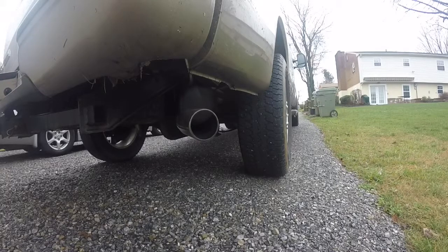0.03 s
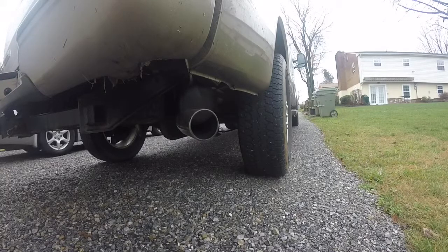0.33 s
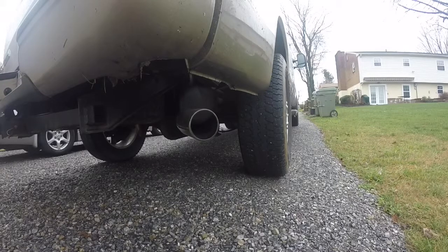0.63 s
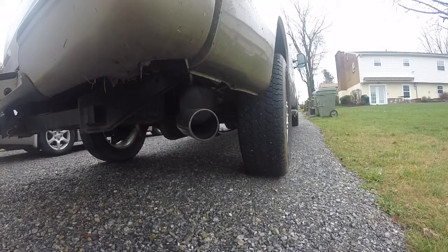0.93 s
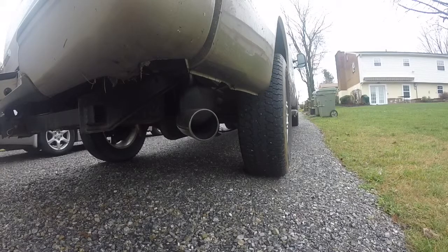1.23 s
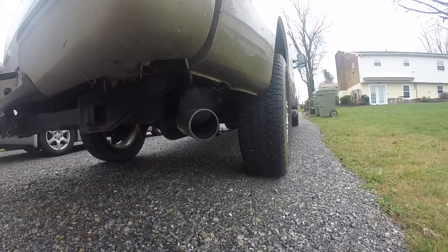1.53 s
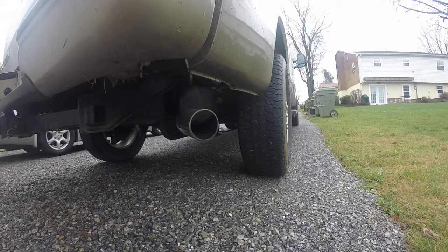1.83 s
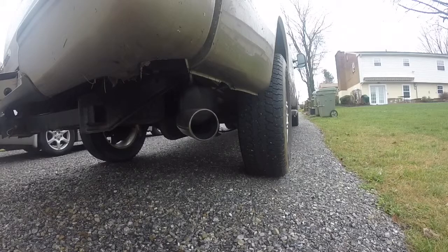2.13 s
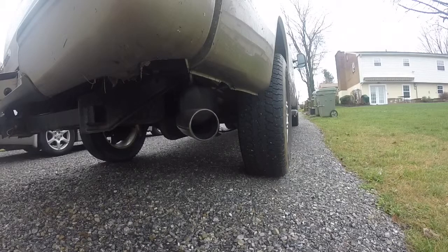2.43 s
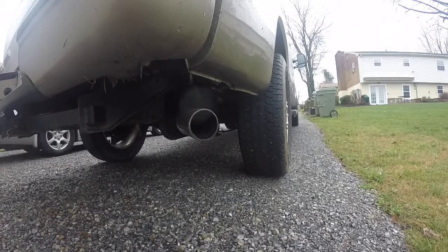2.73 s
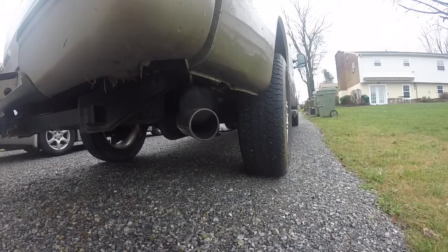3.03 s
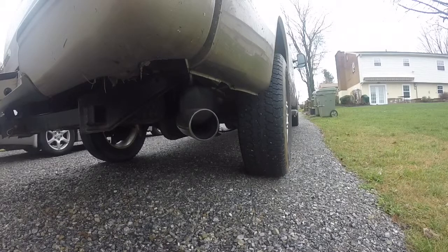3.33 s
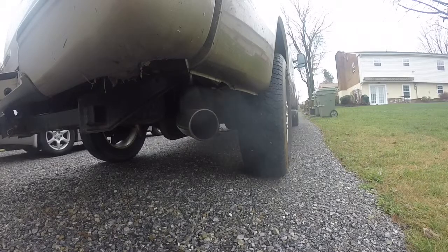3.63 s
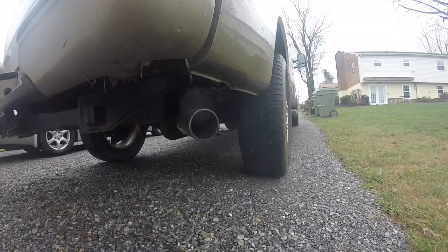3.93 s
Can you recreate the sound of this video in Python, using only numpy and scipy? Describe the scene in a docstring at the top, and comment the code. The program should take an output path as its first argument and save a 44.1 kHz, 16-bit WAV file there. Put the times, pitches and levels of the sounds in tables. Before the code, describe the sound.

A diesel truck engine starts outdoors, with the microphone near the exhaust pipe. After a quiet pump hum, the starter grinds rhythmically until the engine fires, booms and squeals briefly, then idles with a clattering rumble and slight hiss.

```python
"""A diesel pickup starts from cold on a driveway, heard from just behind the tailpipe.
First a fuel pump hums over the outdoor air. The pinion clacks in and the starter gears whine, their
pitch sagging under the load of each compression. Lone ignitions follow; then the engine catches and
runs up with hard knocks that ring the block, a squeal, and pressure pulses that boom in the pipe.
Last it settles, chattering, into a lumpy eight-cylinder idle with a little exhaust hiss."""
import sys
import numpy as np
from scipy import signal
from scipy.fft import rfft, irfft
from scipy.io import wavfile

SR = 44100
rng = np.random.default_rng(int(sys.argv[2]) if len(sys.argv) > 2 else 0)


def store_wav(level_fs):
    """Save 16-bit WAV to argv[1]."""
    pcm = np.round(np.clip(np.atleast_2d(level_fs), -1, 1) * 32767)
    wavfile.write(sys.argv[1], SR, pcm.T.astype(np.int16))


N = 176400
T = np.arange(N) / SR
BURST_RISE_S = 0.0045


def from_db(db):
    """Amplitude ratio: tenfold for every 20 dB."""
    return 10 ** (np.asarray(db) / 20)


def rms_one(x):
    """Normalisation to unit rms."""
    return x / np.sqrt(np.mean(x ** 2) + 1e-20)


def curve(rows, t=T):
    """Linear interpolation of (time_s, value) rows at times t."""
    return np.interp(t, *np.transpose(rows))


def drift(hz):
    """Random fluctuation: low-passed noise of unit rms."""
    r = np.exp(-2 * np.pi * hz / SR)
    return rms_one(signal.lfilter([1], [1, -2 * r, r * r], rng.standard_normal(N + SR))[SR:])


def colour(x, spectrum):
    """Minimum-phase filtering by (frequency_hz, level_db) rows, falling 18 dB an octave beyond them."""
    size = 2 * N
    hz, db = np.transpose(spectrum)
    octave = np.log2(np.maximum(np.arange(N + 1) * SR / size, 1))
    outside = np.abs(octave - np.clip(octave, np.log2(hz[0]), np.log2(hz[-1])))
    shape_db = np.interp(octave, np.log2(hz), db) - 18 * outside
    cepstrum = irfft(np.log(from_db(shape_db)))
    cepstrum[1:N] *= 2  # folding the cepstrum makes the filter causal
    cepstrum[N + 1:] = 0
    return irfft(rfft(x, size) * np.exp(rfft(cepstrum)))[:N]


def noise(spectrum):
    """Spectral shaping of white noise, at unit rms."""
    return rms_one(colour(rng.standard_normal(N), spectrum))


def clicks(times, gains):
    """Impulse excitation at the given times."""
    out, at = np.zeros(N), (times * SR).astype(int)
    np.add.at(out, at[at < N], gains[at < N])
    return out


def burst(start_s, decay_s, hold_s):
    """Transient envelope: linear rise, hold, exponential decay."""
    rise = np.clip((T - start_s) / BURST_RISE_S, 0, 1)
    return rise * np.exp(-np.maximum(T - start_s - hold_s, 0) / decay_s)


def casing(x, modes, share):
    """Resonance: each mode of a metal casing lifts a narrow band."""
    out = x
    for hz, width_hz, lift_db in modes:
        r = np.exp(-np.pi * width_hz / SR)
        feedback = [1, -2 * r * np.cos(2 * np.pi * hz / SR), r * r]
        band = signal.lfilter(np.array([1, 0, -1]) * (1 - r * r) / 2, feedback, x)
        out = out + share * (from_db(lift_db) - 1) * band
    return out


def rattle(envelope, spectrum, modes, grain_db):
    """Random excitation: dense metal contacts of uneven size ring a casing."""
    contacts = rng.standard_normal(N) * from_db(grain_db * drift(350))
    steady_rms = np.std(casing(colour(contacts, spectrum), modes, share=0.57))
    return casing(colour(contacts * envelope, spectrum), modes, share=.5) / steady_rms


# outdoor noise spectrum: frequency_hz, density_db
AIR_SPECTRUM = [(15, -31), (25, -7), (85, -1), (142, -7), (284, -11), (413, -23.5), (512, -17.5),
                (634, -20), (806, -18), (1270, -30), (14800, -55)]

def outdoor_air():
    """Ambient noise: steady, with most of its power at low frequencies."""
    return from_db(-44) * noise(AIR_SPECTRUM)


# pump harmonics: pitch_hz, level_db
PUMP_HARMONICS = [(285.3, -60.5), (570.6, -59.5), (855.9, -63), (1141, -59.5)]
# spectrum of flowing fuel: frequency_hz, density_db
FUEL_SPECTRUM = [(200, 0), (600, 3.5), (1150, -4.5), (1350, -22)]

def fuel_pump():
    """Periodic pumping gives a harmonic hum over flow noise, until just before cranking."""
    clock = np.cumsum(1 + 0.0016 * drift(10.5)) / SR
    hum = sum(from_db(db) * np.sqrt(2) * (1 + 0.45 * drift(23)) * np.sin(2 * np.pi * hz * clock)
              for hz, db in PUMP_HARMONICS)
    flow = from_db(-61) * noise(FUEL_SPECTRUM)
    stop_s, fade_s = 1.174, .06
    return (hum + flow) * np.clip((stop_s - T) / fade_s, 0, 1)


def moan():
    """A glide: one low tone sinks as the engine first turns over."""
    start_s, length_s = 1.5, 0.16
    progress = np.clip((T - start_s) / length_s, 0, 1)
    hz = 166 + 56 * (1 - progress) ** 2
    return from_db(-32) * np.sin(np.pi * progress) * np.sin(2 * np.pi * np.cumsum(hz) / SR)


STARTER_ON_S, STARTER_OFF_S = 1.324, 2.52
# spectrum of the pinion engaging: frequency_hz, density_db
CLACK_SPECTRUM = [(130, 1), (542, -22.5), (838, 2), (1430, -22), (3040, -16.5), (4610, -17.5),
                  (14800, -45.5)]
# blows between gear teeth: start_s, level_db
CLUNKS = [(1.353, -23.5), (2.078, -27.5), (2.427, -22)]
# spectrum of those blows: frequency_hz, density_db
CLUNK_SPECTRUM = [(700, -15.5), (870, 0.5), (1150, -18), (2300, -48)]

def pinion():
    """Impact and backlash: the pinion strikes the ring gear, then clunks as teeth take up slack."""
    strike = burst(STARTER_ON_S, decay_s=0.0054, hold_s=0.036)
    clack = from_db(-31.5) * rattle(strike, CLACK_SPECTRUM, [], grain_db=-2)
    blows = sum(from_db(db) * burst(s, decay_s=0.01, hold_s=BURST_RISE_S) for s, db in CLUNKS)
    return clack + blows * noise(CLUNK_SPECTRUM)


def underbody(x):
    """Interference: reflections between road and chassis make a gliding tone flutter."""
    t, decay_s = T[T < .05], 0.013
    echoes = rng.standard_normal(len(t)) * np.exp(-t / decay_s)
    return x + 0.54 * signal.fftconvolve(x, echoes / np.linalg.norm(echoes))[:N]


SPIN_UP_S, FIRST_PEAK_S, RECOVERY_SHARE = 1.365, 1.487, .48
GROAN_HZ, GROAN_WIDTH_HZ = 851, 53  # near the housing's lowest mode
# compressions while cranking: slowest_s, preceding_peak_hz, slowest_pitch_hz, groan_db
COMPRESSIONS = [(1.578, 989, 745, 5), (1.743, 1171, 777, 5.5), (1.86, 1240, 845.5, 4.5),
                (1.977, 1271, 920.5, -8), (2.09, 1286, 922, -4), (2.205, 1254, 921, -9),
                (2.315, 1270, 916.5, 1), (2.43, 1264, 903, -5)]
# gear mesh partials: pitch_ratio, level_db
MESH_PARTIALS = [(.5, -5), (1, -5), (2, -6), (2.5, -12), (3, -9.5)]
# spectrum of grinding gears: frequency_hz, density_db
GRIND_SPECTRUM = [(130, -14), (324, -1.5), (379, -16), (445, -2.5), (586, -5.5), (855, 0.5), (1460, -23),
                  (1820, -22.5), (3160, -17), (4200, -31.5), (6800, -33.5), (9500, -54.5)]
# bell housing modes: frequency_hz, bandwidth_hz, lift_db
HOUSING_MODES = [(870, 63, 2), (1842, 34, 10), (2454, 76, 10), (3110, 73, 3)]

def starter():
    """Frequency modulation by load: meshing gears slow into each compression and race out of it."""
    slow_s, fast_hz, slow_hz, groan_db = np.transpose(COMPRESSIONS)
    fast_s = np.r_[FIRST_PEAK_S, slow_s[:-1] + RECOVERY_SHARE * np.diff(slow_s)]
    turns_s = np.r_[SPIN_UP_S, np.c_[fast_s, slow_s].ravel(), STARTER_OFF_S]
    turns_hz = np.r_[slow_hz[0], np.c_[fast_hz, slow_hz].ravel(), fast_hz[-1]]
    steps = np.arange(len(turns_s))
    stroke = np.interp(T, turns_s, steps)  # even when slowest, odd when fastest
    eased_stroke = np.floor(stroke) + (1 - np.cos(np.pi * (stroke % 1))) / 2
    hz = np.interp(eased_stroke, steps, turns_hz)
    phase = 2 * np.pi * np.cumsum(hz * (1 + 0.009 * drift(80))) / SR

    running = np.clip((T - STARTER_ON_S) / 0.035, 0, 1) * np.clip((STARTER_OFF_S - T) / 0.047, 0, 1)
    stroke_ahead = np.interp(T + .03, T, stroke)  # load peaks just before the pitch is lowest
    load = running * from_db(3 * np.cos(np.pi * stroke_ahead))
    # the gears quieten while the engine runs ahead of them
    overrun = np.clip(-2 * np.sin(np.pi * (stroke - 1)), 0, 1) * (T > FIRST_PEAK_S)
    coasting = from_db(-6.5 * overrun)

    resonance = np.exp(-.5 * ((hz - GROAN_HZ) / GROAN_WIDTH_HZ) ** 2)
    groan_gain = from_db(np.interp(T, slow_s, groan_db) - 26.5) * resonance
    groan = groan_gain * running * (1 + 0.22 * drift(90)) * np.sin(phase)
    partials = sum(from_db(db) * (1 + 0.45 * drift(70)) * np.sin(k * phase) for k, db in MESH_PARTIALS)
    whine = from_db(-40) * running * partials
    # uneven teeth crowd rough sidebands around the upper partials
    sidebands = sum(drift(22) * np.sin(k * phase) for k in np.arange(9, 30) / 4)
    rasp = from_db(-45.5) * load * hz / GROAN_HZ * rms_one(colour(sidebands, GRIND_SPECTRUM))
    gears = underbody(casing(whine + rasp, HOUSING_MODES, share=1.6))
    grind = from_db(-31.5) * rattle(load, GRIND_SPECTRUM, HOUSING_MODES, grain_db=1.5)
    return coasting * (gears + groan) + grind


# spectrum of gas leaving the pipe: frequency_hz, density_db
HISS_SPECTRUM = [(3000, -33.5), (4050, -3), (4300, -7.5), (4620, -0.5), (5300, -14.5), (8000, -25),
                 (14000, -49)]
# hiss envelope: time_s, level_db
HISS_LEVELS = [(2.95, -82), (3.1, -55.5), (3.42, -64.5), (3.56, -52.5), (3.85, -47.5), (4.0, -50.5)]

def tailpipe_hiss():
    """Flow noise: gas rushes from the tailpipe with a thin whistle once the engine runs."""
    whistle = from_db(-60.5) * drift(40) * np.sin(2 * np.pi * 4600 * T)
    rush = from_db(curve(HISS_LEVELS)) * noise(HISS_SPECTRUM)
    return (rush + whistle) * (T > HISS_LEVELS[0][0])


# spectrum of squealing metal: frequency_hz, density_db
SQUEAL_SPECTRUM = [(5500, -27.5), (5850, -3.5), (6050, -2), (6190, 5.5), (6450, -26.5)]
# squeal envelope: time_s, level_db
SQUEAL_LEVELS = [(2.54, -62), (2.57, -39.5), (2.61, -52), (2.71, -71), (2.76, -37), (2.82, -38.5),
                 (2.86, -34), (2.885, -60), (2.97, -54), (3.04, -75.5)]

def squeal():
    """Narrow-band noise is heard as a rough metallic squeal while the engine catches."""
    return from_db(curve(SQUEAL_LEVELS)) * (T > SQUEAL_LEVELS[0][0]) * noise(SQUEAL_SPECTRUM)


# swells of chatter: centre_s, level_db
CHATTER_SWELLS = [(3.101, -40.5), (3.215, -46), (3.335, -44), (3.49, -45.5)]
# chatter spectrum: frequency_hz, density_db
CHATTER_SPECTRUM = [(2100, -13), (2700, 1.5), (3600, -15.5)]
# engine block modes, rung by combustion too: frequency_hz, bandwidth_hz, lift_db
BLOCK_MODES = [(447.3, 9.9, 10.5), (680.5, 20, 13.5), (2934, 40, 12), (3100, 35, 12), (6130, 290, 9.5)]

def chatter():
    """Contact noise: bright swells ring the block while the idle settles."""
    width_s = 0.027
    swells = sum(from_db(db) * np.exp(-.5 * ((T - s) / width_s) ** 2) for s, db in CHATTER_SWELLS)
    return rattle(swells, CHATTER_SPECTRUM, BLOCK_MODES, grain_db=3)


FIRST_CYLINDER_S, JITTER_S, SCATTER_DB = 3.002, 0.00056, 1.5
# idle speed: time_s, firing_rate_hz
FIRING_RATE = [(3.07, 63), (3.2, 64), (3.32, 63.5), (3.45, 62), (3.58, 62.5), (3.7, 60.6), (4.0, 60)]
# cylinders in firing order: pulse_db, knock_db, bark_db
CYLINDERS = [(-0.5, -8.5, 2), (-18.5, -6, -7), (-1.5, -9, -6), (-7.5, 1.5, -18), (-8.5, -3, -6),
             (-9.5, -0.5, -8), (-0.5, -2, 4), (-3.5, -0.5, -2.5)]

def idle_firings():
    """Cyclic modulation: eight unequal cylinders fire in turn, which makes the idle lumpy."""
    count = np.cumsum(curve(FIRING_RATE)) / SR
    count -= np.interp(FIRST_CYLINDER_S, T, count)
    firing = np.arange(-1, count[-1]).astype(int)
    chance = rng.standard_normal((200, 4))[:len(firing)].T
    idle_s = np.interp(firing, count, T) + JITTER_S * chance[0]
    levels_db = np.array(CYLINDERS)[firing % len(CYLINDERS)].T + SCATTER_DB * chance[1:]
    return idle_s, *levels_db


# first, lone ignitions: start_s, level_db, decay_s
IGNITIONS = [(2.413, -33, 0.048), (2.5, -28, 0.052), (2.56, -22.5, 0.037), (2.62, -28, 0.077),
             (2.667, -29, 0.066), (2.745, -22, 0.052)]
# firings on full fuel, which drive the exhaust too: start_s, pulse_db, knock_db
RUN_UP = [(2.654, 24.5, -42.5), (2.694, 27.5, -33.5), (2.736, 28.5, -29), (2.775, 39.5, -21),
          (2.806, 41.5, -19.5), (2.833, 33.5, -19), (2.856, 40, -18), (2.881, 42.5, -23),
          (2.901, 40, -20.5), (2.92, 42.5, -22.5), (2.939, 39.5, -22), (2.953, 35.5, -30),
          (2.97, 44, -41.5)]
# hard knock spectrum: frequency_hz, density_db
KNOCK_SPECTRUM = [(200, -3), (376, -10.5), (434, -1.5), (590, -7.5), (880, 0), (1150, -8), (1680, -19.5),
                  (2980, -10), (3570, -21.5), (5030, -26.5), (6250, -26.5), (7100, -33), (8000, -25),
                  (9200, -40), (9900, -37), (10800, -48), (14800, -56)]
# idle clatter spectrum: frequency_hz, density_db
CLATTER_SPECTRUM = [(370, -14), (443, 0), (584, -3.5), (681, -1.5), (746, -7), (870, -4.5), (1680, -21.5),
                    (2880, -19.5), (3680, -29), (4630, -28), (14800, -56.5)]
# idle clatter envelope: time_s, level_db
CLATTER_LEVELS = [(3.35, -34.5), (3.43, -35), (3.75, -32.5)]

def combustion(idle_s, knock_db):
    """Sudden pressure rises ring the block: lone ignitions, hard knocks, then softer idle clatter."""
    lone = sum(from_db(db) * burst(s, decay_s, hold_s=0.011) for s, db, decay_s in IGNITIONS)
    lag_s = 0.0037
    run_up_power = sum((from_db(db) * burst(s + lag_s, decay_s=0.034, hold_s=BURST_RISE_S)) ** 2
                       for s, _, db in RUN_UP)
    knock = rattle(np.sqrt(lone ** 2 + run_up_power), KNOCK_SPECTRUM, BLOCK_MODES, grain_db=1.5)
    rise_s, fall_s = 0.0074, 0.015
    poles = np.exp(-1 / (np.array([rise_s, fall_s]) * SR))
    beats = signal.lfilter([1], np.poly(poles), clicks(idle_s, from_db(knock_db)))
    idle_envelope = from_db(curve(CLATTER_LEVELS)) * .5 * rms_one(beats)
    return knock + rattle(idle_envelope, CLATTER_SPECTRUM, BLOCK_MODES, grain_db=0)


# exhaust pipe modes: frequency_hz, level_db, t60_s
PIPE_MODES = [(25.5, -8, 0.35), (52.5, 1.5, 0.22), (78, -1, .18), (120, -23, 0.19)]
# how hard the run-up drives those modes: time_s, level_db
BOOM_LEVELS = [(2.65, -19), (2.79, -12), (2.88, -21), (2.97, -23.5)]

def pipe_boom():
    """Standing waves: cranking puffs and run-up firings excite the low modes of the pipe."""
    crank_s = np.array(COMPRESSIONS)[:, 0] + 0.0074  # just after each compression
    run_s = np.array(RUN_UP)[:, 0]
    puffs = clicks(crank_s, np.full(len(crank_s), from_db(-32)))
    puffs += clicks(run_s, from_db(curve(BOOM_LEVELS, run_s)))
    soft_puffs = signal.sosfilt(signal.butter(2, 70, fs=SR, output="sos"), puffs + 1e-18)
    boom = 0
    for hz, db, t60_s in PIPE_MODES:
        r = from_db(-60 / (t60_s * SR))
        feedback = [1, -2 * r * np.cos(2 * np.pi * hz / SR), r * r]
        boom += from_db(db) * signal.lfilter([1, -1], feedback, soft_puffs)
    return boom


# spectrum of air pumped through the pipe: frequency_hz, density_db
RUMBLE_SPECTRUM = [(15, -36.5), (21, 8.5), (26, 8), (35, -19.5), (52, 0.5), (64, -6), (78, -7), (105, -17),
                   (150, -25.5)]
# rumble envelope: time_s, level_db
RUMBLE_LEVELS = [(1.32, -72), (1.35, -30.5), (1.5, -32.5), (1.56, -29), (2.35, -29.5), (2.55, -20),
                 (2.7, -13), (2.88, -19), (3.0, -36)]
# spectrum of one exhaust pulse: frequency_hz, level_db
THUD_SPECTRUM = [(30, -14), (48, -5.5), (65, -1.5), (92, 2.5), (124, 2.5), (150, -8.5), (192, -8.5),
                 (255, -16), (320, -24.5), (400, -45), (800, -62.5)]
# throaty edge of the sharper pulses: frequency_hz, level_db
BARK_SPECTRUM = [(130, -14.5), (195, -7.5), (260, 1.5), (320, -10), (400, -27.5)]
# strength of the idle pulses: time_s, gain_db
IDLE_EFFORT = [(3.04, 40), (3.38, 41.5), (3.44, 37), (3.52, 40.5)]

def exhaust(idle_s, pulse_db, bark_db):
    """Radiation from an open pipe: pumped air rumbles; pressure pulses boom, thud and bark."""
    run_s, run_db, _ = np.transpose(RUN_UP)
    effort_db = curve(IDLE_EFFORT, idle_s)
    pulses = clicks(run_s, from_db(run_db)) + clicks(idle_s, from_db(pulse_db + effort_db))
    thud = colour(pulses, THUD_SPECTRUM)
    bark = colour(clicks(idle_s, from_db(bark_db + effort_db - 13)), BARK_SPECTRUM)
    rumble = from_db(curve(RUMBLE_LEVELS)) * noise(RUMBLE_SPECTRUM)
    return rumble - pipe_boom() - thud - bark


def scene():
    """Superposition: the truck and the outdoor air add at one microphone."""
    idle_s, pulse_db, knock_db, bark_db = idle_firings()
    engine = exhaust(idle_s, pulse_db, bark_db) + combustion(idle_s, knock_db)
    engine += chatter() + squeal() + tailpipe_hiss()
    return (fuel_pump() + pinion() + starter() + moan() + engine + outdoor_air())[None]


def record(dry):
    """Soft saturation rounds the highest peaks; a low-pass filter cuts the top of the treble."""
    ceiling, stopband_hz = .92, 15900
    rounded = dry / (1 + (dry / ceiling) ** 8) ** (1 / 8)
    return signal.sosfilt(signal.cheby2(12, 60, stopband_hz, fs=SR, output="sos"), rounded)


dry = scene()
out = record(dry)
store_wav(out)
```